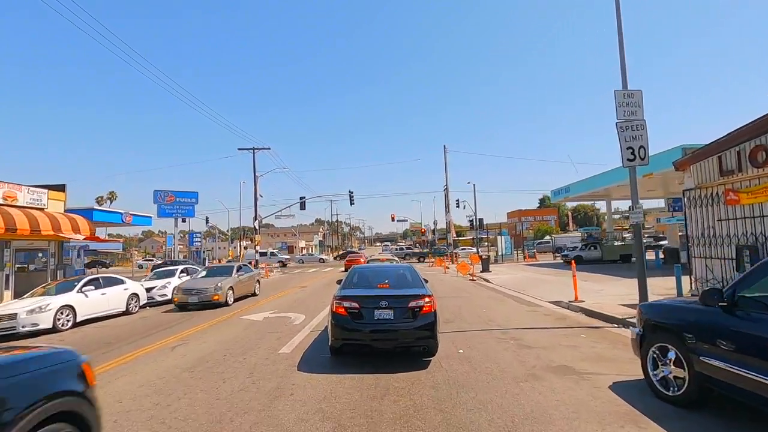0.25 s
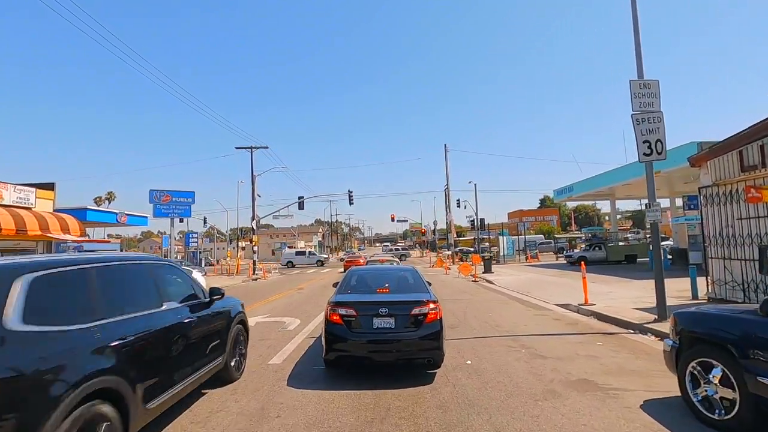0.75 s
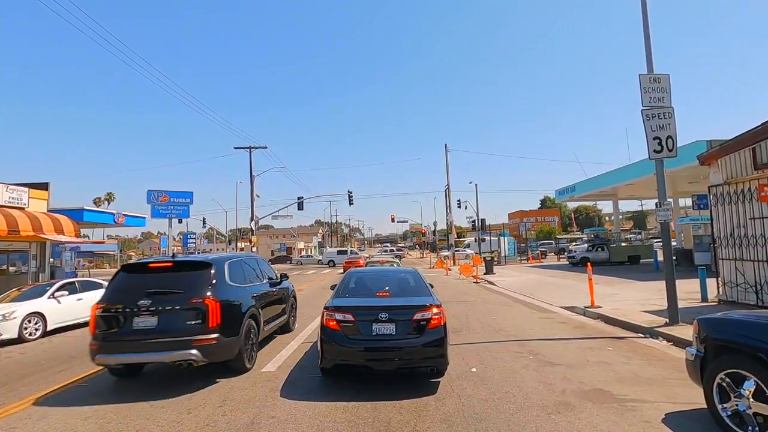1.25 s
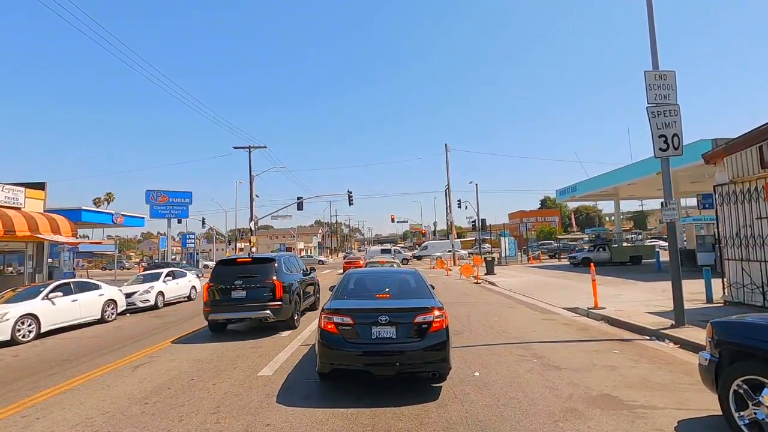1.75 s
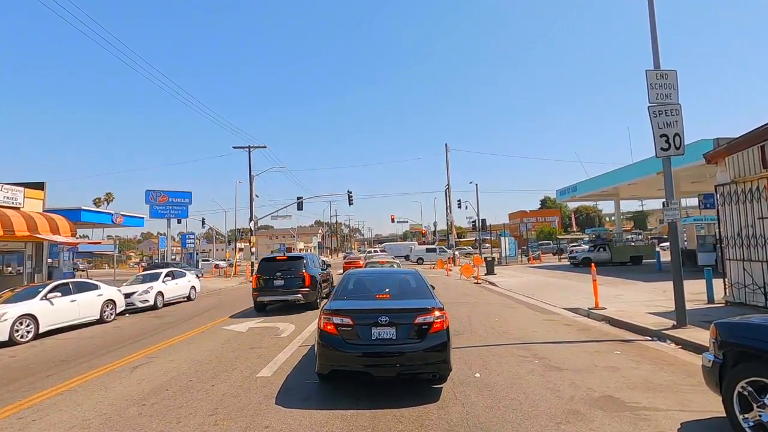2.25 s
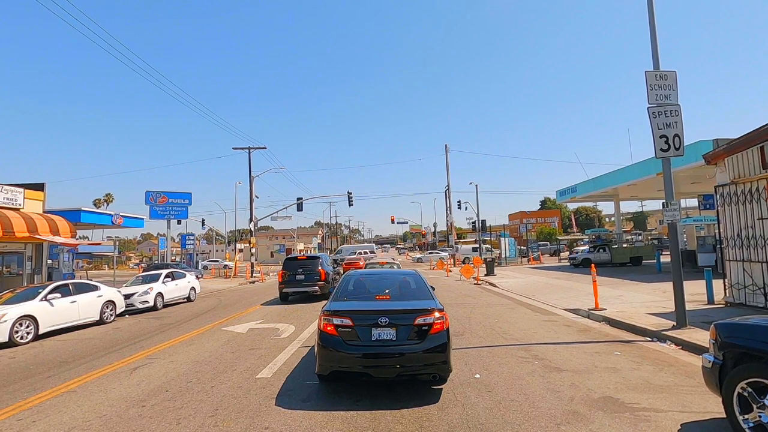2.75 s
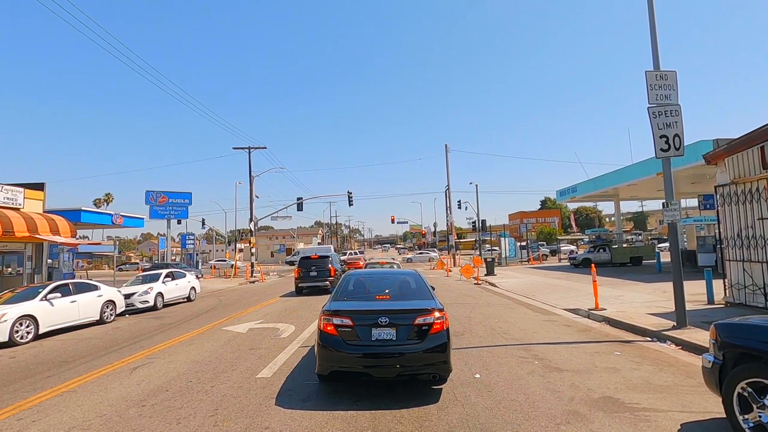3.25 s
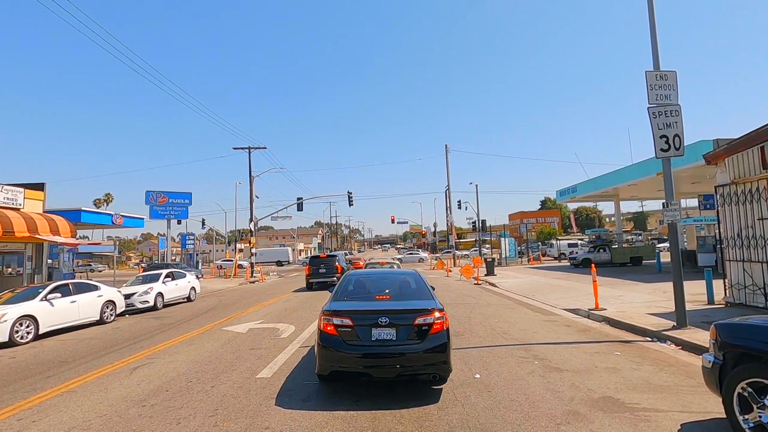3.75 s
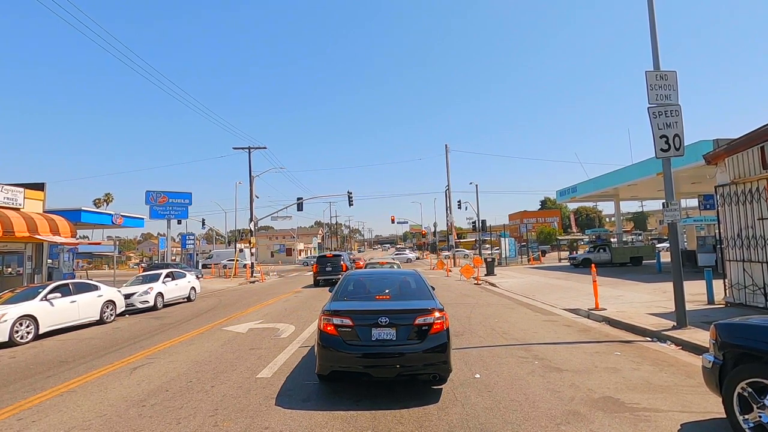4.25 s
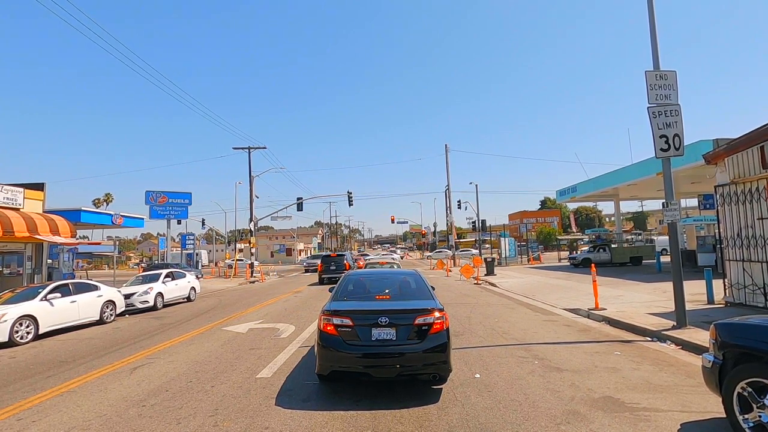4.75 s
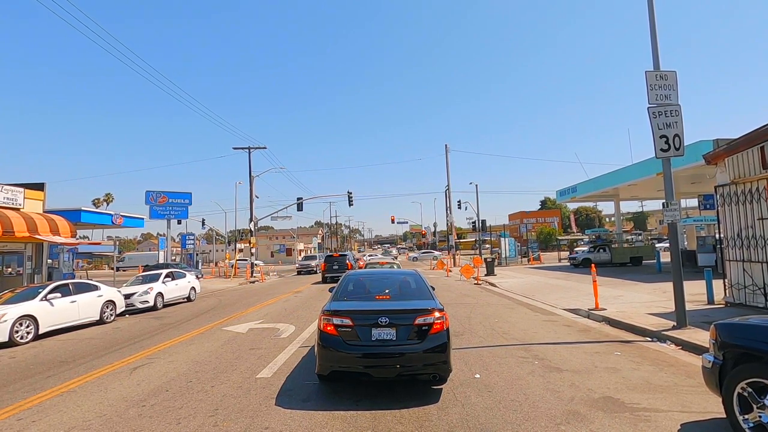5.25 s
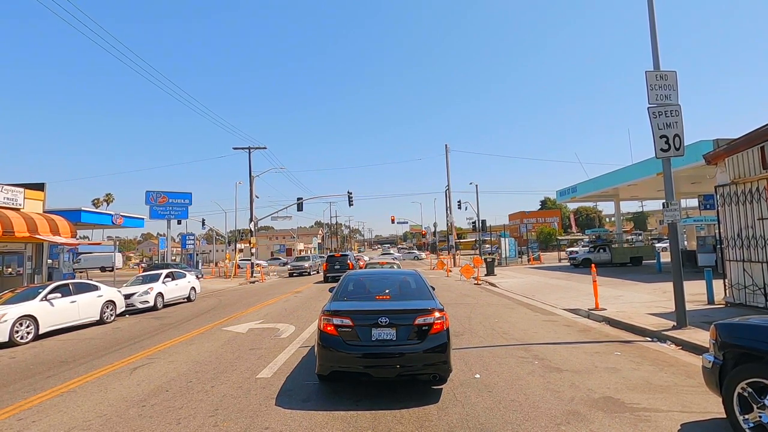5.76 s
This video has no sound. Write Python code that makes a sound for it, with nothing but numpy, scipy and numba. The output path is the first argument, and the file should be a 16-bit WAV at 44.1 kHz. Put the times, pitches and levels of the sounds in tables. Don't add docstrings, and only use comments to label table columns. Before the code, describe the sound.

Steady dull traffic roar heard from inside a stopped car, a passing car's faint tyre hiss, then two very short loud twin-tone horn taps with quick street echoes.

```python
import sys
import numpy as np
from scipy import signal
from scipy.fft import rfft, irfft, next_fast_len
from scipy.io import wavfile
from scipy.ndimage import uniform_filter1d, map_coordinates
from numba import njit

SR = 44100
rng = np.random.default_rng(int(sys.argv[2]) if len(sys.argv) > 2 else 0)


def inscribe(sig):
    pcm = np.round(np.clip(np.atleast_2d(sig).T, -1, 1) * 32767)
    wavfile.write(sys.argv[1], SR, pcm.astype(np.int16))


def level_to_linear(level):
    exponent = np.asarray(level, float) / 20
    return 10 ** exponent


N = 264908

# start_s, level_db, contact_closed_s
HORN_TAPS = [
    (3.4769, 0.5, 0.022),
    (4.382, 0, 0.023),
]
HORN_PITCHES = [408, 815, 1230, 1652, 2040, 2470, 524, 1016, 1535, 2028, 2550, 2850]
# level_db, lag_s, rise_s, sounds_on_after_release_s, ring_off_t60_s
LOW_HORN = [(-2.5, 0.0061, 0.03, 0.0083, 0.04), (0.5, 0.00076, 0.01, -0.0032, 0.061),
            (0.5, 0.004, 0.013, -0.00039, 0.038), (-25, 0.004, 0.0071, 0.00077, 0.027),
            (-23.5, 0.012, 0.0077, .001, .045), (-51.5, .008, .006, 0.015, .04)]
HIGH_HORN = [(-8.5, 0.002, 0.011, 0.016, 0.057), (-7, 0.0055, 0.0071, 0.0068, 0.028),
             (-28, 0.0064, 0.0085, 0.001, 0.066), (-29, 0.014, 0.0035, -0.0086, 0.035),
             (-45, .014, 0.0063, 0.027, .05), (-53, 0.015, 0.014, -0.0041, .05)]
# pitch_hz, level_db
CONTACT_BUZZ = [(200, -22.5), (350, 1.5), (700, 4), (1300, -20), (1800, -13.5), (2400, -19), (3000, -34),
                (3600, -70), (9000, -120)]
# extra_path_m, level_db
ECHOES = [
    (7.2, -15),
    (10.3, -12),
    (12.8, -15),
    (15.1, -14.5),
    (20.6, -24),
    (25.5, -32.5),
    (28.2, -21),
    (40.5, -36),
]
# pitch_hz, level_db
WALL_COLOUR = [(300, -2), (420, -11.5), (520, -9), (810, -0.5), (1015, 0.5), (1230, -6), (1535, 7),
               (1650, -8), (2050, -4), (2600, -6), (4000, -11)]
# pitch_hz, t60_s
STREET_TAIL = [(300, 0.11), (600, 0.16), (1000, 0.23), (2500, 0.17), (8000, 0.12)]
# time_s, level_db
ROAD_ROAR = [(0, -36), (0.7, -38.5), (1.6, -36.5), (1.95, -37.5), (3.4, -40.5), (3.7, -40), (5.4, -40),
             (6, -41.5)]
# pitch_hz, level_db
ENGINE_COLOUR = [(16, -41.5), (28, -17), (103, -1.5), (174, -3.5), (216, -2), (300, -5.5), (390, -21),
                 (660, -120)]
# pitch_hz, level_db
TYRE_COLOUR = [(120, -33.5), (200, -6.5), (224, -2), (329, -2), (463, -0.5), (600, -3), (688, -2),
               (753, -2.5), (955, -3.5), (1490, -16), (1800, -21), (3000, -39.5), (3900, -57.5),
               (6600, -120)]
# nearest_s, hiss_level_db, heard_for_s, sharpness_0_to_1
CLOSE_CARS = [
    (0.2, -69, 0.31, 0.13),
    (1.12, -73, 0.13, .9),
    (1.55, -67, 0.32, .1),
    (2.5, -79.5, .5, 0.3),
    (4.99, -75, .04, .5),
]
# pitch_hz, level_db
SHARP_HISS = [(2500, -36.5), (3800, -8.5), (4400, -1), (4750, 0), (5100, -4.5), (5800, -6.5), (8000, -16.5),
              (11000, -30), (16000, -51.5)]
# pitch_hz, level_db
DULL_HISS = [(1200, -26.5), (2000, 5.5), (2800, 1), (3700, -4.5), (4500, -13.5), (7000, -28),
             (16000, -57.5)]
# time_s, pitch_hz
BRAKE_SQUEAKS = [
    (1.04, 3950),
    (1.065, 5680),
    (1.115, 5000),
    (1.148, 4600),
    (1.15, 4900),
    (1.245, 5600),
    (1.3, 5940),
    (1.5, 4750),
    (1.56, 3600),
]
# time_s, pitch_hz, level_db, half_length_s
PEBBLE = [
    (4.99, 4800, -78, .004),
]
# time_s, pitch_hz, level_db, half_length_s
DISTANT_HORN = [
    (1.364, 690, -34, 0.045),
]
# pitch_hz, level_db
MICROPHONE_COLOUR = [(1500, -37), (2800, -9), (3500, -2), (4500, -6.5), (6000, -9), (8000, -12.5),
                     (11000, -16.5), (14900, -22), (15300, -44.5)]


def unit(x):
    return x / np.sqrt(np.mean(x ** 2) + 1e-20)


def along(points, hz):
    pitch, value = np.transpose(points)
    return np.interp(np.log(hz + 1), np.log(pitch + 1), value)


def coloured(x, colour):
    return irfft(rfft(x) * level_to_linear(along(colour, np.fft.rfftfreq(len(x), 1 / SR))), len(x))


def wobble(rate_hz):
    knots = rng.standard_normal(int(N * rate_hz / SR) + 4)
    return map_coordinates(knots, [np.arange(N) * rate_hz / SR])


def rush(colour, patchy_db):
    z = signal.stft(rng.standard_normal(N), nperseg=512)[2]
    patches = uniform_filter1d(rng.standard_normal(z.shape), size=5, axis=0)
    patches = uniform_filter1d(patches, size=10, axis=1)
    noise = signal.istft(z * level_to_linear(patchy_db * unit(patches)), nperseg=512)[1][:N]
    padded = np.pad(noise, (0, next_fast_len(N + 8192) - len(noise)))
    return unit(coloured(padded, colour)[:N])


def horn():
    dry = np.zeros(N + SR)
    for start_s, level_db, closed_s in HORN_TAPS:
        tap = toot(closed_s, flutter=0.2) + contact_rasp(closed_s, level_db=-21)
        dry[round(start_s * SR):][:SR // 4] = level_to_linear(level_db) * tap
    return signal.fftconvolve(dry, street(tail_db=-13))[:N]


def toot(closed_s, flutter):
    t = np.arange(SR // 4) / SR
    level_db, lag, rise, linger, t60 = np.transpose(LOW_HORN + HIGH_HORN)[:, :, None]
    build = 1 - np.exp(-(np.clip(t - lag, 0, None) / rise) ** 2)
    ring_off = level_to_linear(-60 * np.clip(t - closed_s - linger, 0, None) / t60)
    knots = rng.standard_normal((2, len(HORN_PITCHES), 40))
    size, turn = flutter * signal.resample(knots, len(t), axis=2)
    phase = 2 * np.pi * np.array(HORN_PITCHES)[:, None] * t + turn
    partials = level_to_linear(level_db) * build * ring_off * np.exp(size / 2) * np.sin(phase)
    return np.sum(partials, axis=0)


def contact_rasp(closed_s, level_db):
    t = np.arange(SR // 4) / SR
    noise = unit(coloured(rng.standard_normal(len(t)), CONTACT_BUZZ))
    build = 1 - np.exp(-(t / 0.012) ** 2)
    ring_off = level_to_linear(-60 * np.clip(t - closed_s, 0, None) / 0.11)
    return level_to_linear(level_db) * noise * build * ring_off


def street(tail_db):
    hz, t, z = signal.stft(rng.standard_normal(SR // 2), SR, nperseg=256)
    fade = level_to_linear(-60 * t / along(STREET_TAIL, hz)[:, None])
    tail = signal.istft(z * fade, SR, nperseg=256)[1]
    tail = tail / np.linalg.norm(tail)
    answer = level_to_linear(tail_db) * np.pad(tail, (round(0.017 * SR), 0))
    for path_m, level_db in ECHOES:
        delay_s = path_m / 343
        blur = np.exp(-(np.arange(-40, 41) / (0.0014 * delay_s * SR)) ** 2)
        answer[round(delay_s * SR) - 40:][:81] += level_to_linear(level_db) * blur / blur.sum()
    answer = coloured(answer, WALL_COLOUR)
    answer[0] += 1
    return answer


def traffic():
    time_s, level_db = np.transpose(ROAD_ROAR)
    tyres_db = np.interp(np.arange(N) / SR, time_s, level_db)
    engines_db = -44 + 0.066 * (tyres_db - tyres_db.mean())
    swell = wobble(2)
    engines = level_to_linear(engines_db + 1.2 * wobble(6)) * rush(ENGINE_COLOUR, patchy_db=0.1)
    tyres = level_to_linear(tyres_db + 0.21 * swell) * rush(TYRE_COLOUR, patchy_db=-0.18)
    sharp_gain, dull_gain = passing_cars()
    hiss = sharp_gain * rush(SHARP_HISS, patchy_db=4.5) + dull_gain * rush(DULL_HISS, patchy_db=2.0)
    return engines + tyres + level_to_linear(0.6 * swell) * hiss


def passing_cars():
    shading = 1.6
    nearest, level_db, heard, sharp = np.transpose(CLOSE_CARS)[:, :, None]
    distance = (np.arange(N) / SR - nearest) / heard
    power = level_to_linear(2 * level_db) / (1 + distance ** 2) ** shading
    sharp_gain = np.sqrt(np.sum(power * sharp, axis=0))
    dull_gain = np.sqrt(np.sum(power * (1 - sharp), axis=0))
    return sharp_gain, dull_gain


def small_notes():
    out = np.zeros(N)
    t = np.arange(-SR // 5, SR // 5) / SR
    squeaks = [(time_s, hz, -78, 0.016) for time_s, hz in BRAKE_SQUEAKS]
    for time_s, hz, level_db, half_s in DISTANT_HORN + PEBBLE + squeaks:
        note = np.exp(-(t / half_s) ** 2) * np.sin(2 * np.pi * hz * t)
        out[round(time_s * SR) - SR // 5:][:len(t)] += level_to_linear(level_db) * note
    return out


def microphone_hiss():
    return level_to_linear(-78.5) * rush(MICROPHONE_COLOUR, patchy_db=1.3)


def scene():
    return (horn() + traffic() + small_notes() + microphone_hiss())[None]


@njit
def gain_control(x, top, margin, keep, slow_share, fast, slow):
    out = np.zeros(len(x))
    start, peak, cut_fast, cut_slow = 0, 0.0, 0.0, 0.0
    for i in range(len(x)):
        peak = max(peak, abs(x[i]))
        cut_fast *= fast
        cut_slow *= slow
        if i == len(x) - 1 or x[i] * x[i + 1] <= 0:
            gain = np.exp(-cut_fast - cut_slow)
            extra = np.log(peak * gain / top / margin) if peak * gain > top else 0.0
            for j in range(start, i + 1):
                out[j] = x[j] * gain * np.exp(-extra)
            cut_fast += keep * extra * (1 - slow_share)
            cut_slow += keep * extra * slow_share
            start, peak = i + 1, 0.0
    return out


def band_limit(x):
    return signal.sosfilt(signal.butter(12, 15600, fs=SR, output="sos"), x)


def record(dry):
    fast = np.exp(-1 / (0.4 * SR))
    slow = np.exp(-1 / (3.5 * SR))
    mix = gain_control(dry[0], 0.6, 0.95, 0.83, 0.068, fast, slow)
    return band_limit(mix[None])


dry = scene()
out = record(dry)
inscribe(out)
```